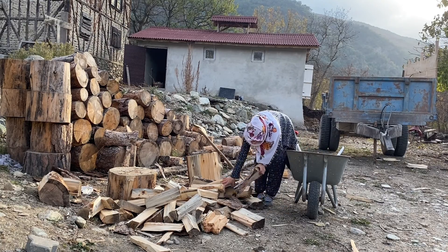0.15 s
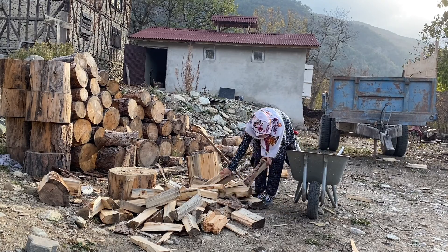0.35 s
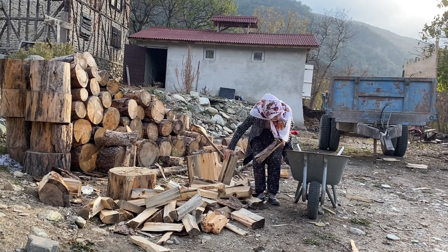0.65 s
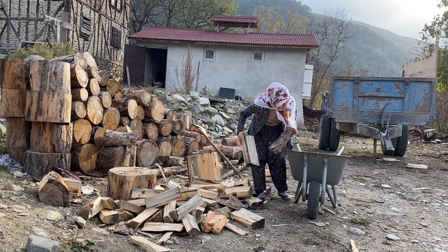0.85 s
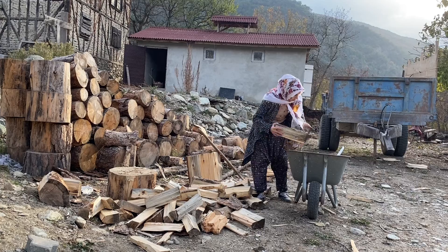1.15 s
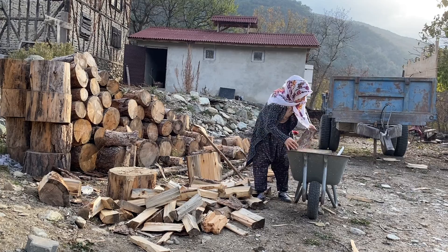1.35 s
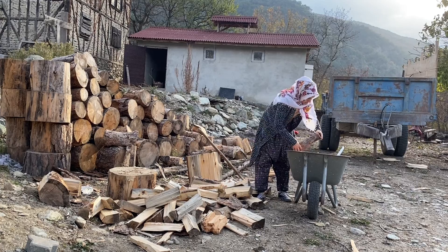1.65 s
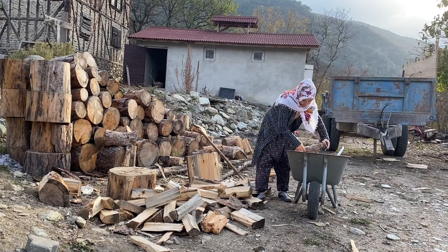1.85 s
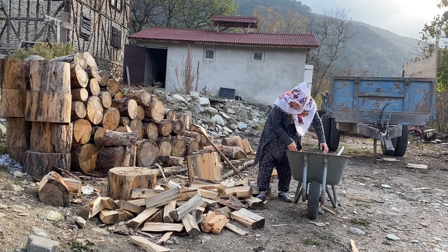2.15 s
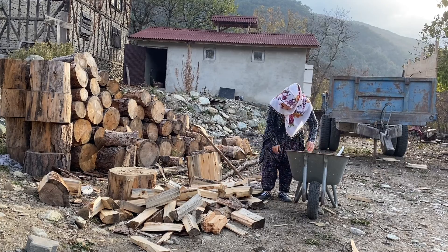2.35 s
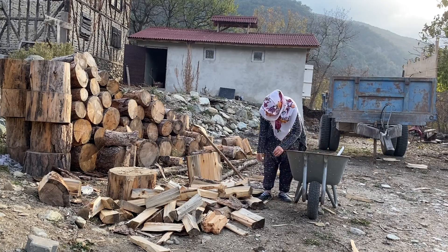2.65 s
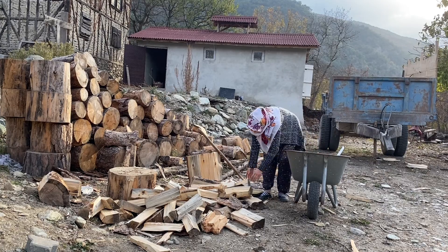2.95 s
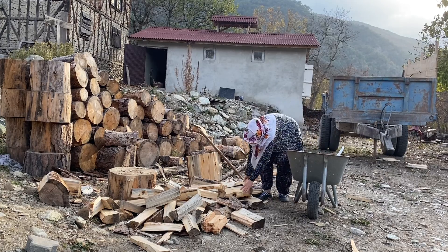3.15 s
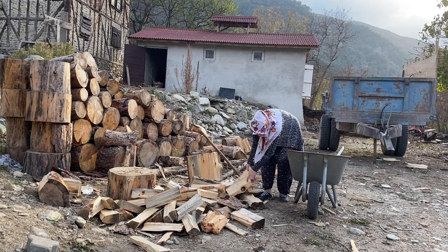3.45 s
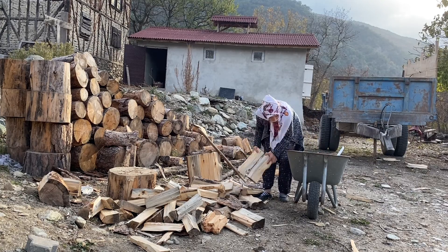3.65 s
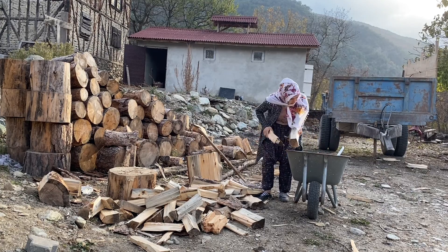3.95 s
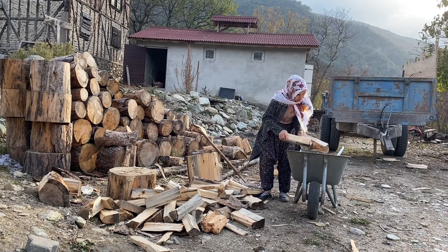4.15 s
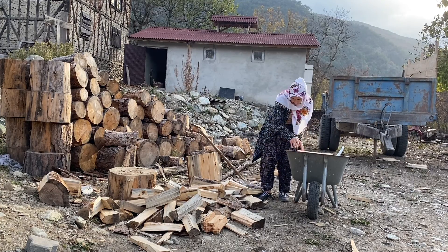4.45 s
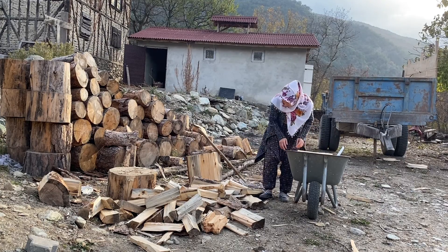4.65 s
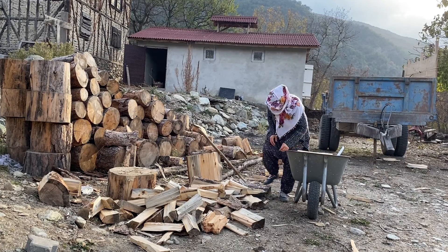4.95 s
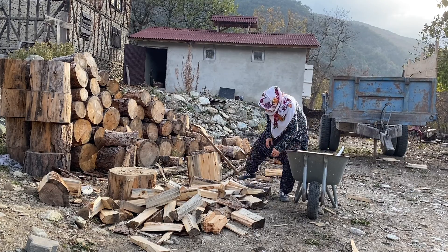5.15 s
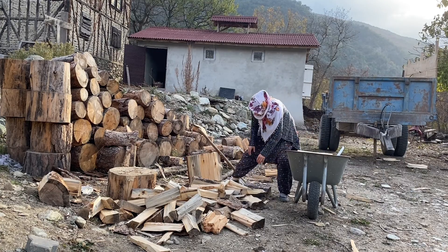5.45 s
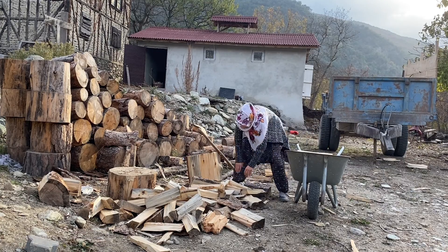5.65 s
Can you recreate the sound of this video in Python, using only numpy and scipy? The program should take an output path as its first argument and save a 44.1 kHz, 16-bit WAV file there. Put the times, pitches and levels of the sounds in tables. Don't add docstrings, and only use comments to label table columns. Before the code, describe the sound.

Outdoors in a quiet farmyard, a phone a few metres away picks up firewood being gathered: bark scrapes, a sharp cluster of wooden knocks, then a loud hollow drop into a steel wheelbarrow with a smaller one after. More light clicking and scraping follows, a double clack, a very faint far cow, and another boomy landing. Soft low wind bumps the microphone throughout; the end is nearly quiet.

```python
import sys
import numpy as np
from scipy import signal
from scipy.fft import rfft, irfft, next_fast_len
from scipy.io import wavfile
from scipy.ndimage import map_coordinates

SR = 44100
rng = np.random.default_rng(int(sys.argv[2]) if len(sys.argv) > 2 else 0)


def natural_amplitude(level_db):
    exponent = np.asarray(level_db, float) / 20
    return 10 ** exponent


def store_pcm(level_fs):
    pcm = np.round(np.clip(level_fs, -1, 1) * 32767).astype(np.int16)
    wavfile.write(sys.argv[1], SR, np.atleast_2d(pcm).T)


N = 255339

# full_pressure_s, held_s, level_db, rasp_over_hiss_db
STROKES = [(0, 0.8, -68, -1), (.37, 0.056, -62.5, -4), (.445, 0.0063, -56, -10.5), (.54, 0.061, -56, -5.5),
           (0.629, 0.0089, -50.5, -18.5), (0.739, 0.0079, -69.5, -18.5), (1.309, 0.0053, -57.5, -20),
           (1.452, 0.0082, -43.5, -31.5), (1.47, 0.065, -74.5, 22), (1.64, 0.041, -64.5, -48),
           (1.89, 0.033, -66, -20.5), (2.014, 0.035, -42, -19), (2.229, 0.11, -60, 2), (2.68, 0.21, -73, 7),
           (3.329, 0.35, -65, 2.5), (3.44, 0.0054, -55, -12), (3.609, 0.005, -59, -16),
           (3.392, 0.0087, -56.5, -16), (3.59, .003, -64, -16), (.97, 0.018, -69.5, -14.5),
           (1.185, .012, -70, -18.5), (3.4, 0.012, -56, -17), (3.765, 0.0018, -45, 8.5),
           (4.341, 0.018, -50, -3), (4.39, 0.069, -57.5, 0.5), (4.5, 0.4, -76, 3),
           (5.2, 0.079, -73.5, -1.5)]
# freq_hz, density_db_per_hz
HISS = [(2000, -34.5), (3000, -1.5), (5000, 0), (7300, 2.5), (9000, -9), (11000, -4.5), (13300, -10),
        (15500, -12), (16500, -3)]
# freq_hz, density_db_per_hz
RASP = [(300, -20.5), (500, -24.5), (900, 7), (1400, -8), (2300, 6.5), (3000, -8.5), (4000, -48)]
# time_s, level_db
BUFFET = [(0.0, -49.5), (.2, -53.5), (0.48, -53.5), (0.72, -58), (1.26, -57), (1.55, -52), (1.79, -54),
          (1.97, -58), (2.18, -57), (2.34, -45.5), (2.74, -55), (2.82, -54), (4.24, -56.5), (4.5, -51.5),
          (4.71, -55.5), (5.5, -58), (5.79, -56.5)]
# freq_hz, density_db_per_hz
GUST = [(12, -46), (20, -23), (48, 2), (70, 5), (120, -9.5), (188, -33), (260, -40), (340, -72),
        (570, -120)]
# start_s, peak_db, pitch_hz
EDDIES = [(0.102, -51, 63.4), (0.253, -41, 65), (.289, -51, 69.6), (.354, -41, 95), (0.374, -37, 60.7),
          (1.768, -50, 100.2), (2.256, -43.5, 62.4), (2.333, -40.5, 62.6), (2.381, -49, 68.4),
          (2.424, -44.5, 79), (2.651, -47, 77), (2.719, -52, 81), (2.768, -45.5, 66.4), (2.925, -48.5, 75),
          (3.121, -45.5, 67.4), (3.981, -49, 60.6), (4.206, -56, 65.5), (4.948, -51, 64.8),
          (5.181, -64, 62.1), (5.491, -55, 68.4), (5.672, -51, 70.2)]
# freq_hz, density_db_per_hz
AIR = [(82, -36.5), (140, -2.5), (411, -9), (703, -5.5), (1590, -19), (2600, -24.5), (4770, -33),
       (8160, -42), (11900, -50.5), (16400, -59)]
# freq_hz, left_right_likeness
AIR_ALIKE = [(150, 0.72), (400, 0.44), (700, -0.38), (1300, -0.49), (2400, 0.33), (5000, -0.31),
             (12000, -0)]
# start_s, peak_db, ring_hz, t60_s
NOTES = [(.026, -33, 407, .015), (.035, -58, 800, .4), (.085, -46, 330, .02), (.161, -45.5, 596, .3),
         (.535, -47, 610, .2), (.618, -11, 2070, .006), (.62, -32, 520, .025), (.6195, -19, 1500, .009),
         (.6235, -23, 1250, .01), (.631, -24, 400, .04), (.634, -37, 436, .15), (.64, -38, 218, .095),
         (.65, -29, 1136, .05), (.665, -36, 470, .08), (1.4335, -7, 700, .03), (1.4355, -11, 330, .02),
         (1.44, -29, 990, .12), (1.45, -38, 393, 1.3), (1.46, -31, 867, .24), (1.47, -35, 600, .35),
         (1.63, -40, 690, .4), (2.012, -36, 1960, .3), (2.014, -38, 2500, .12), (2.04, -43, 996, .41),
         (2.041, -48, 393, 1.2), (2.636, -25, 765, .0097), (2.64, -41, 1176, .037), (3.612, -48, 1870, .08),
         (3.773, -19, 1111, .022), (3.79, -42, 578, .3), (3.844, -37, 480, .022), (4.337, -38, 2370, .025),
         (4.36, -35, 600, .15), (4.432, -37, 960, .2), (4.44, -43, 393, 1.3), (4.5, -52, 445, 1.1),
         (4.46, -36, 108, .5), (4.47, -38, 291, .43), (4.51, -47, 676, 1.2), (5.617, -43, 1900, .007),
         (5.6175, -45, 2900, .006)]
# start_s, peak_db, ring_hz, crack_db
KNOCKS = [(.499, -39.5, 440, -17), (.53, -33.5, 460, -16), (.545, -33.5, 2510, -14.5),
          (.608, -25.5, 1566, -28), (.618, -19.5, 2240, -27.5), (.644, -33, 604, -15.5),
          (.732, -45, 597, -10.5), (.743, -38.5, 546, -31), (1.412, -34, 457, -21.5),
          (1.446, -23.5, 1003, -13), (1.8765, -39, 2380, -9), (1.974, -31, 655, -15),
          (2.009, -24, 1067, -25.5), (2.222, -44, 820, -27), (2.34, -51.5, 1920, -16.5),
          (2.637, -43, 1790, -35), (2.702, -47, 776, -38), (2.718, -54, 660, -26.5), (3.284, -56, 476, -14),
          (3.322, -49.5, 570, -10), (3.405, -39.5, 520, -5), (3.462, -43.5, 1660, -18),
          (3.529, -44.5, 1710, -15), (3.629, -43, 1750, -29), (3.742, -43.5, 1440, -2),
          (3.75, -34.5, 478, -13), (5.617, -53.5, 2237, -28), (4.337, -31.5, 675, -31),
          (4.409, -32.5, 2620, -10.5), (4.419, -42, 994, -39)]
# start_s, peak_db, ring_hz, crack_db
CLACKS = [(.278, -43, 1910, -25), (.63, -23, 1166, -19), (.654, -23.5, 490, -35), (.675, -29.5, 1130, -34),
          (.698, -42, 520, -22), (.866, -38, 566, -37), (1.42, -11.5, 632, -28.5), (1.618, -29, 480, -36),
          (1.627, -35, 660, -23), (2.036, -26.5, 1044, -38), (2.059, -25, 1095, -32.5),
          (2.26, -39.5, 900, -26), (2.303, -38.5, 839, -34), (3.356, -39, 2370, -19.5),
          (3.405, -37.5, 2580, -12), (3.429, -42, 1590, -21), (3.559, -58, 2350, -23),
          (3.651, -53, 2420, -27), (3.537, -49, 1970, -18), (3.55, -38.5, 472, -19),
          (3.758, -23.5, 466, -18), (3.775, -24.5, 554, -20), (4.046, -47.5, 483, -21.5),
          (4.439, -19.5, 731, -45), (5.002, -55, 1720, -21), (5.776, -52.5, 1820, -32)]
# start_s, peak_db, ring_hz
TICKS = [(0.12, -55, 1000), (.441, -43, 1700), (.95, -56.5, 520), (1.305, -56, 580), (3.6, -54, 2370),
         (3.341, -48, 1600), (3.444, -43.5, 2300), (3.576, -47, 3600), (3.588, -45, 1020),
         (3.607, -38.5, 2600), (3.3, -46, 1700), (3.338, -47.5, 1620), (3.48, -49, 3800), (3.64, -47, 1800),
         (2.236, -50, 2100), (1.02, -63.5, 540), (3.932, -57.5, 700), (5.092, -59.5, 820),
         (4.048, -58, 6200)]
# freq_hz, density_db_per_hz
GRAIN = [(250, 1), (400, 6.5), (1000, -2.5), (1500, -4), (2400, -1.5), (3200, -13.5), (4500, -18),
         (6000, -37)]
# start_s, peak_db, boom_hz, clang_db
THUDS = [(0.532, -36.5, 207, -8), (0.619, -34, 305, 10), (1.419, -16, 238, -0.5), (1.432, -15, 158, -6.5),
         (1.446, -18, 265, -18), (1.454, -12.5, 203, -5.5), (1.486, -28, 210, 5), (1.522, -41, 233, 6.5),
         (1.551, -37.5, 191.3, 4.5), (1.624, -26.5, 217, -13.5), (1.639, -16.5, 215, -18.5),
         (1.672, -23, 208, -14.5), (1.719, -30.5, 217, -21), (1.987, -29, 149, -24), (2.024, -33.5, 188, 6),
         (2.048, -23.5, 199, -8.5), (2.072, -25, 198, -18), (2.109, -37.5, 178, -0.5),
         (2.141, -40.5, 218, -7), (2.088, -33, 192, -10.5), (3.545, -45, 201, -20), (3.752, -43.5, 348, 18),
         (4.344, -21, 201, -15), (4.356, -23, 156, -7.5), (4.372, -19, 128, -12), (4.384, -14, 201, -23),
         (4.409, -24.5, 188, -11.5), (4.432, -23, 242, -3), (4.446, -16.5, 214, -13.5),
         (4.489, -27, 212, -8)]
# freq_hz, level_db, t60_s
TUB_MODES = [(109.55, -3.5, 0.41), (229, -2.5, 0.31), (291.3, -14.5, 0.18), (155, -20.5, 0.25),
             (416, -18.5, 0.84), (458, -21, 0.49), (539, -16, 0.62), (590, -18, 0.43), (683, -18, 0.51),
             (776, -12.5, 0.47), (862, -14.5, 0.41), (981, -11.5, 0.29), (1044, -22, 0.32)]
# freq_hz, level_db, t60_s
RIM_MODES = [(1125, -24, 0.71), (1210, -33.5, 0.35), (1298, -31.5, 0.27), (1430, -31.5, .26),
             (1470, -32, 0.33), (1617, -22, 0.27), (1840, -24.5, 0.26), (2006, -31.5, .22),
             (2250, -28, 0.16), (2686, -30.5, 0.25)]
# freq_hz, density_db_per_hz
CLANG = [(41, -42), (70, -20), (97, 0), (134, -17), (193, 5), (363, -8), (436, -5), (482, -22), (770, -9),
         (818, -11), (9000, -63.5), (11700, -99), (19800, -120)]
# freq_hz, t60_s
CLANG_T60 = [(100, 0.25), (250, 0.45), (800, 0.31), (2000, 0.15), (7000, 0.18)]
# start_s, held_s, level_db, centre_hz
GRINDS = [(0.6087, .008, -37.5, 1523), (.6235, .014, -36.5, 1990), (.643, .014, -43, 2410),
          (1.41, .022, -34, 2220), (1.436, 0.035, -39.5, 2324), (1.479, .03, -45, 2000),
          (1.973, 0.01, -43, 2440), (2.008, .014, -32, 1883), (2.025, 0.011, -41, 2590),
          (2.255, .01, -51, 1200), (3.36, 0.039, -57.5, 2430), (3.47, .05, -57, 2190),
          (3.56, 0.039, -57.5, 2400), (3.742, 0.015, -45.5, 1660), (3.756, .01, -42.5, 2600),
          (3.776, 0.0097, -48, 2350), (4.336, 0.0061, -37, 2310), (4.358, 0.027, -45.5, 1500),
          (4.409, .014, -38, 2090), (4.428, .025, -48, 1686)]
# start_s, level_db, ring_hz, t60_s, rise_s
SWELLS = [(1.415, -12, 610, 0.033, 0.0038), (1.432, -26, 106.3, 0.5, 0.017), (1.45, -19, 229, .16, 0.0067),
          (1.974, -34, 643, 0.086, 0.0033), (2.008, -21, 992, 0.095, .005),
          (2.012, -48, 2990, 0.12, 0.0026), (2.011, -51, 3397, .15, .004), (2.013, -44, 1744, 0.12, 0.0046),
          (2.053, -30, 1920, .05, 0.0028), (2.069, -40.5, 2036, 0.12, .004),
          (3.749, -30, 456, 0.055, 0.0021), (3.752, -27, 950, .04, 0.0033),
          (3.766, -19, 572.4, 0.094, .012), (3.794, -39.5, 286, .07, .005), (4.375, -31, 195, 0.18, .012),
          (2.036, -24.5, 399, 0.13, .005), (1.418, -21, 393, 0.055, .004), (4.412, -37, 1826, .08, 0.0054),
          (4.43, -33, 697, .09, .006), (4.455, -32, 892, 0.11, .01)]
# time_s, pitch_hz, level_db
COW = [
    (3.5, 144, -74),
    (3.65, 147, -61),
    (4.0, 148.5, -60),
    (4.22, 146.5, -61),
    (4.4, 143, -78),
    (4.5, 143, -105),
]
# multiple, level_db
COW_ORDERS = [(2, -18), (3, 0), (4, -18), (5, -11), (7, -14), (8, -13), (9, -9), (10, -9), (12, -18),
              (14, -21), (16, -21)]
# freq_hz, density_db_per_hz
SWISH = [(3000, -22), (4900, 2), (6000, -6), (7200, 1), (8600, -22)]
# freq_hz, density_db_per_hz
SIZZLE = [(6500, -22.5), (8000, -10), (11000, 4), (15500, -4), (16500, -18)]
# freq_hz, t60_s
YARD = [(200, 0.28), (1500, 0.19), (8000, 0.04)]
# freq_hz, left_lead_rad
LEAD = [(100, 0.09), (400, 0.32), (1000, 0.61), (3000, 0.68), (6000, 1.02), (10000, 1.62), (15000, 1.96)]
# low_hz, high_hz, mid_threshold_db, side_threshold_db
FAINT_BANDS = [(8300, 9600, -62, -110), (12500, 13800, -66, -110), (13800, 16000, -88, -80),
               (16000, 17000, -70, -70)]

PRESS_DB_PER_S, LIFT_DB_PER_S = 795.5, 341.5
SETTLE_DB, SETTLE_DB_PER_S = -26, 33
AIR_DB = -64.5
EDDY_TURNS = 2.4
DULL, CLEAR, SHARP = (0.042, -4.5), (0.037, -19), (0.036, -13.5)  # ring_t60_s, body_db
TICK_CRACK_DB = -7.5
DETUNE = 0.03
GRIND_RISE_S, GRIND_TAIL_S, GRIND_SPREAD = 0.004, 0.008, 0.33
GRAIN_T60_S, GRAIN_PAN_DB = 0.011, 1.2
LATE_DB_PER_S, HIGH_LOSS_DB = 500, 5
SWISH_AT, SIZZLE_AT = (4.66, -71, 0.085), (4.75, -72, 0.037)  # middle_s, level_db, spread_s
TOP_HZ = 16700


def unit(x):
    return x / np.sqrt(np.mean(x ** 2) + 1e-20)


def along(points, hz):
    f, v = np.transpose(points)
    return np.interp(np.log(hz + 1), np.log(f + 1), v)


def curves(rows):
    s, *cols = np.transpose(rows)
    return [np.interp(np.arange(N) / SR, s, c) for c in cols]


def wobble(rate_hz):
    knots = rng.standard_normal(int(N * rate_hz / SR) + 4)
    return map_coordinates(knots, [np.arange(N) * rate_hz / SR])


def filtered(x, response):
    m = next_fast_len(N + SR // 2)
    return irfft(rfft(x, m) * response(np.fft.rfftfreq(m, 1 / SR)), m)[..., :N]


def rush(spectrum, alike, grit=1):
    def shape(hz):
        turn = np.arccos(np.clip(along(alike, hz), -1, 1)) / 2
        return natural_amplitude(along(spectrum, hz)) * [np.cos(turn), np.sin(turn)]

    mid, side = filtered(grit * rng.standard_normal((2, N)), shape)
    return unit(np.array([mid + side, mid - side]))


def dying_noise(t60s, spectrum, count):
    hz, t, z = signal.stft(rng.standard_normal((count, SR // 2)), SR, nperseg=256)
    level_db = along(spectrum, hz)[:, None] - 60 * t / along(t60s, hz)[:, None]
    tail = signal.istft(z * natural_amplitude(level_db), SR, nperseg=256)[1]
    return tail[:, :SR // 2] / np.linalg.norm(tail, axis=1, keepdims=True)


def ports(pair, lead):
    return filtered(pair, lambda hz: np.exp(.5j * along(lead, hz) * [[1], [-1]]))


def add(track, s, sound):
    start = round(s * SR)
    track[..., start:start + sound.shape[-1]] += sound


def strokes():
    t, gains = np.arange(N) / SR, np.zeros((2, N))
    for s, held, db, rasp_db in STROKES:
        press = natural_amplitude(-PRESS_DB_PER_S * np.maximum(s - t, 0))
        after = np.maximum(t - s - held, 0)
        fade = natural_amplitude(-LIFT_DB_PER_S * after) + natural_amplitude(SETTLE_DB - SETTLE_DB_PER_S * after)
        gains += natural_amplitude([[db], [db + rasp_db]]) * press * fade
    return gains


def chips(count, size):
    when, pitch, force = rng.random((count, 3)).T[:, :, None]
    t = np.arange(size) / SR
    decay = natural_amplitude(-7 * np.log(force + .09) - 60 * t / .012)
    tick = decay * np.sin(2 * np.pi * 500 * 6.5 ** pitch * t)
    index = (when * N).astype(int) + np.arange(size)
    return unit(np.bincount(index.ravel(), tick.ravel(), N + size)[:N])


def scrape():
    hiss_gain, rasp_gain = strokes()
    clumps = natural_amplitude(2 * wobble(60) + 2.5 * wobble(400))
    hiss = natural_amplitude(-6.5) * rush(HISS, [(4000, 0.25), (8000, 0.061)], grit=clumps)
    rasp = natural_amplitude(-4) * rush(RASP, [(1000, .75)], grit=clumps)
    rasp = rasp + natural_amplitude(-4.5) * chips(count=2200, size=1200)
    return hiss_gain * hiss + rasp_gain * rasp


def wind():
    eddies = np.zeros(N + SR)
    for s, db, hz in EDDIES:
        t = np.arange(0, EDDY_TURNS / hz, 1 / SR)
        add(eddies, s, natural_amplitude(db + 4) * np.sin(2 * np.pi * hz * t) * np.hanning(len(t)) ** .8)
    buffet = natural_amplitude(curves(BUFFET)[0] + 2.5 * wobble(26)) * rush(GUST, [(30, 0.52), (120, 0.9)])
    air = natural_amplitude(AIR_DB + 3.5 + 0.34 * wobble(9.5)) * rush(AIR, AIR_ALIKE)
    return buffet + eddies[:N] * natural_amplitude([[.7], [-.7]]) + air


def notes():
    out, t = np.zeros(N + SR), np.arange(SR) / SR
    flutter = np.pad(wobble(34), (0, SR))
    attack = 1 - np.exp(-t / 0.00028)
    for s, db, hz, t60 in NOTES:
        decay = natural_amplitude(db - 60 * t / t60 + 2.1 * flutter[round(s * SR):][:SR])
        add(out, s, decay * np.sin(2 * np.pi * hz * t) * attack)
    return ports(out[:N] * np.ones((2, 1)), LEAD)


def contacts():
    ticks = [(*row, TICK_CRACK_DB) for row in TICKS]
    kinds = (KNOCKS, DULL), (CLACKS, CLEAR), (ticks, SHARP)
    return [(s, db, hz, *kind, crack_db) for rows, kind in kinds for s, db, hz, crack_db in rows]


def knocks():
    out, t = np.zeros(N + SR), np.arange(SR // 4) / SR
    dull, bright = rush(GRAIN, [(1000, 0.85)])[0], rush(HISS, [(1000, 0.64)])[0]
    snap = natural_amplitude(3 - 60 * t / .007)
    body_decay = snap + natural_amplitude(-1.0 - 60 * t / 0.12) + natural_amplitude(-9.0 - 60 * t / 0.1)
    crack_decay = snap + natural_amplitude(-3 - 60 * t / 0.064) + natural_amplitude(-19.0 - 60 * t / 0.11)
    attack = 1 - np.exp(-t / 0.0005)
    for s, db, hz, t60, body_db, crack_db in contacts():
        start = round(7 * s * SR) % (N - len(t))
        ring = np.sin(2 * np.pi * hz * t) * natural_amplitude(-2.5 - 60 * t / max(t60, .005))
        body = dull[start:][:len(t)] * natural_amplitude(body_db - 3.5) * body_decay
        crack = bright[start:][:len(t)] * natural_amplitude(crack_db + 4.0) * crack_decay
        add(out, s, natural_amplitude(db) * (ring + body + crack) * attack)
    return ports(out[:N] * natural_amplitude([[.4], [-.4]]), LEAD)


def steel_ring(t):
    ring = np.zeros(len(t))
    for hz, db, t60 in TUB_MODES + RIM_MODES:
        level, phase, shift = rng.normal(0, 1, 3)
        mode_hz = hz * (1 + DETUNE * (hz > 1100) * shift)
        ring += natural_amplitude(db + 2 * level - 60 * t / t60) * np.sin(2 * np.pi * mode_hz * t + 3 * phase)
    return ring


def tub():
    out, t = np.zeros(N + SR), np.arange(2 * SR // 3) / SR
    clangs = dying_noise(CLANG_T60, CLANG, count=len(THUDS))
    for (s, db, hz, clang_db), clang in zip(THUDS, clangs):
        boom = np.sin(2 * np.pi * hz * t) * natural_amplitude(-60 * t / 0.052) * (1 - np.exp(-t / 0.0015))
        add(out, s, natural_amplitude(db + 7.0) * boom)
        if 1.4 < s < 2.5 or 4.3 < s < 4.6:
            ring = steel_ring(t) * (1 - np.exp(-t / 0.0032))
            add(out, s, natural_amplitude(db + clang_db - 3.5) * ring)
            attack = 1 - np.exp(-t[:len(clang)] / 0.0008)
            add(out, s, natural_amplitude(db + clang_db + 26.5) * clang * attack)
    radiated = signal.sosfilt(signal.butter(2, 90, "high", fs=SR, output="sos"), out[:N])
    return ports(radiated * natural_amplitude([[.8], [-.8]]), LEAD)


def grinds(count=130, size=400):
    out, t = np.zeros((2, N + SR)), np.arange(size) / SR
    for s, held, db, hz in GRINDS:
        when, late = rng.random((2, count, 1))
        pitch, force, pan = rng.normal(0, 1, (3, count, 1))
        after = held * when - GRIND_TAIL_S * np.log(late + 1e-3) * (when > .6)
        loss_db = LATE_DB_PER_S * np.maximum(after - held, 0) + HIGH_LOSS_DB * np.maximum(pitch, 0)
        rise = np.minimum(after / GRIND_RISE_S + .1, 1)
        density = np.sqrt(held / GRAIN_T60_S / count * 40)
        gain = natural_amplitude(db + 2 * force - loss_db) * rise * density
        crack_hz = hz * np.exp(GRIND_SPREAD * pitch)
        tick = gain * natural_amplitude(-60 * t / GRAIN_T60_S) * np.sin(2 * np.pi * crack_hz * t)
        index = (np.round(after * SR).astype(int) + np.arange(size)).ravel()
        pair = [np.bincount(index, (tick * natural_amplitude(side * GRAIN_PAN_DB * pan)).ravel()) for side in (1, -1)]
        add(out, s, np.array(pair))
    return ports(out[:, :N], LEAD)


def swells():
    out, t = np.zeros(N + SR), np.arange(SR // 2) / SR
    for s, db, hz, t60, rise in SWELLS:
        swell = 1 - np.exp(-(t / rise) ** 2)
        add(out, s, natural_amplitude(db - 60 * t / t60) * np.sin(2 * np.pi * hz * t) * swell)
    return ports(out[:N] * natural_amplitude([[.6], [-.6]]), LEAD)


def cow():
    hz, db = curves(COW)
    phase = 2 * np.pi * np.cumsum(hz + .8 * wobble(9)) / SR
    low = np.zeros((2, N))
    for k, level_db in COW_ORDERS:
        lead_rad = 0.22 * k * np.array([[1], [-1]])
        low += natural_amplitude(level_db + 3.0 * wobble(12)) * np.sin(k * phase + lead_rad)
    return natural_amplitude(db) * low


def sleeve():
    def brush(middle_s, db, spread_s):
        return natural_amplitude(db) * np.exp(-.5 * ((np.arange(N) / SR - middle_s) / spread_s) ** 2)

    swish = brush(*SWISH_AT) * rush(SWISH, [(5000, 0.39)])
    return swish + brush(*SIZZLE_AT) * rush(SIZZLE, [(5000, 0.16)])


def yard(x):
    mid, side = dying_noise(YARD, [(100, 0)], count=2)
    tail = np.array([mid + 0.59 * side, mid - 0.17 * side])
    return signal.fftconvolve(np.pad(x, ((0, 0), (400, 0))), tail, axes=1)[:, :N]


def scene():
    wood = knocks() + notes() + tub()
    walls = natural_amplitude(-17) * yard(wood)
    return wood + walls + scrape() + sleeve() + wind() + cow() + grinds() + swells()


def mute_faint_treble(x):
    hz, _, z = signal.stft(np.array([x[0] + x[1], x[0] - x[1]]) / 2, SR, nperseg=1024)
    for low, high, mid_db, side_db in FAINT_BANDS:
        band = (hz >= low) & (hz < high)
        level = np.sqrt(np.sum(abs(z[:, band]) ** 2, axis=1))
        z[:, band] *= (level > natural_amplitude([[mid_db], [side_db]]))[:, None]
    mid, side = signal.istft(z, SR, nperseg=1024)[1][:, :N]
    return np.array([mid + side, mid - side])


def top_cut(x):
    return signal.sosfilt(signal.butter(12, 16710, fs=SR, output="sos"), x)


def record(dry):
    limited = filtered(dry, lambda hz: hz < TOP_HZ)
    mix = mute_faint_treble(limited)
    return top_cut(mix)


dry = scene()
out = record(dry)
store_pcm(out)
```